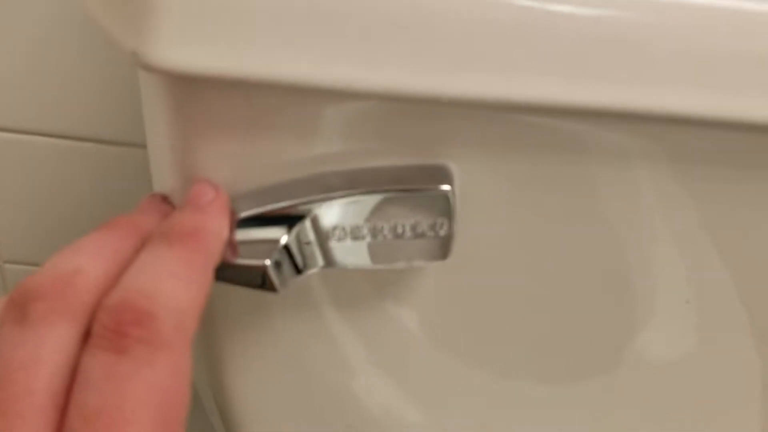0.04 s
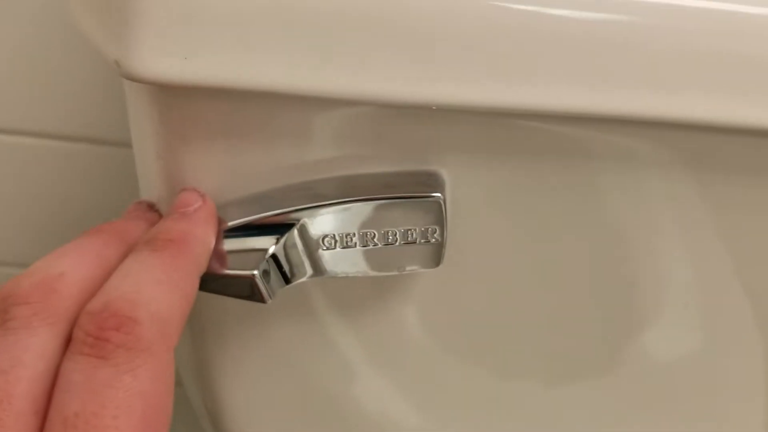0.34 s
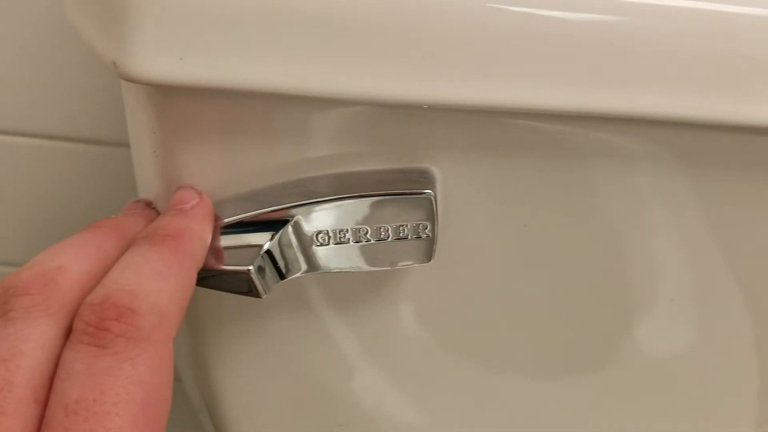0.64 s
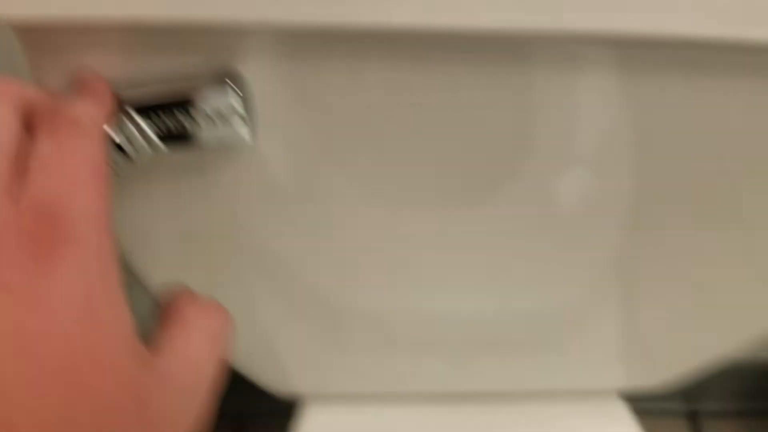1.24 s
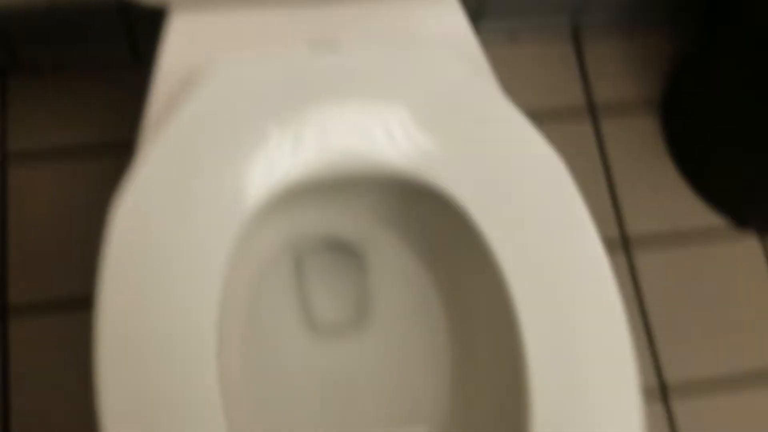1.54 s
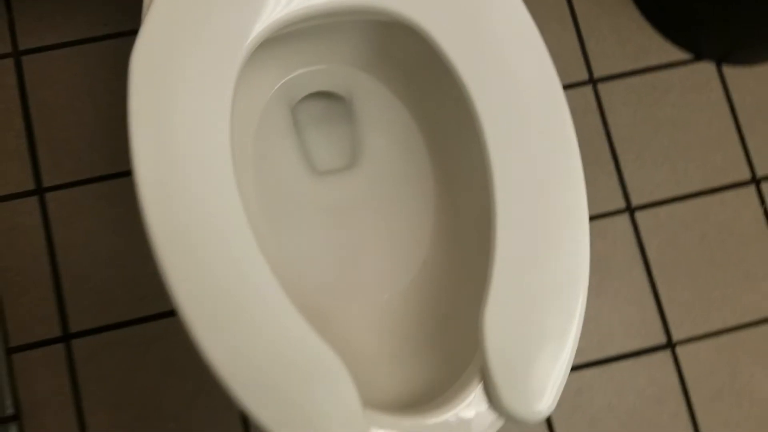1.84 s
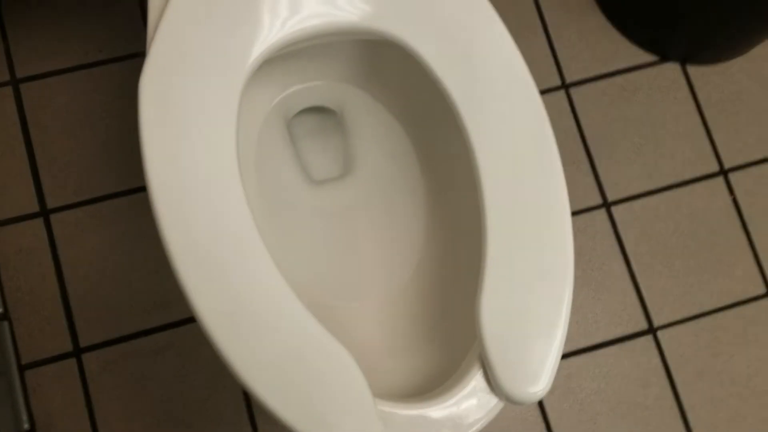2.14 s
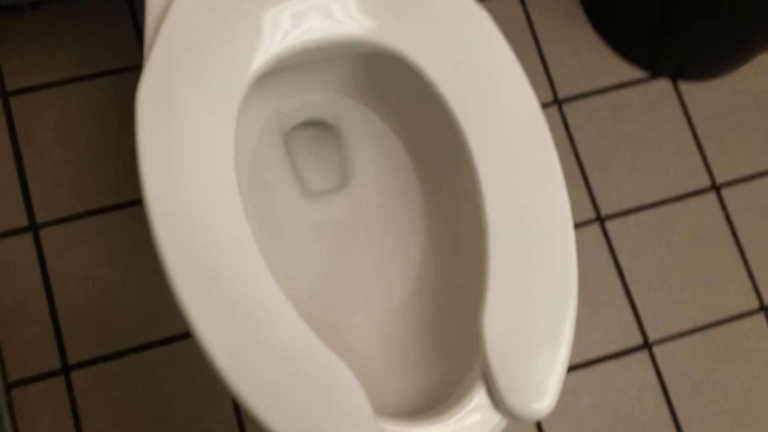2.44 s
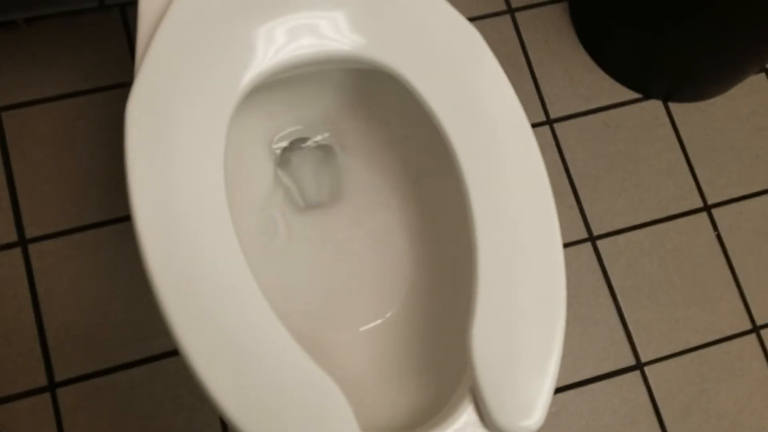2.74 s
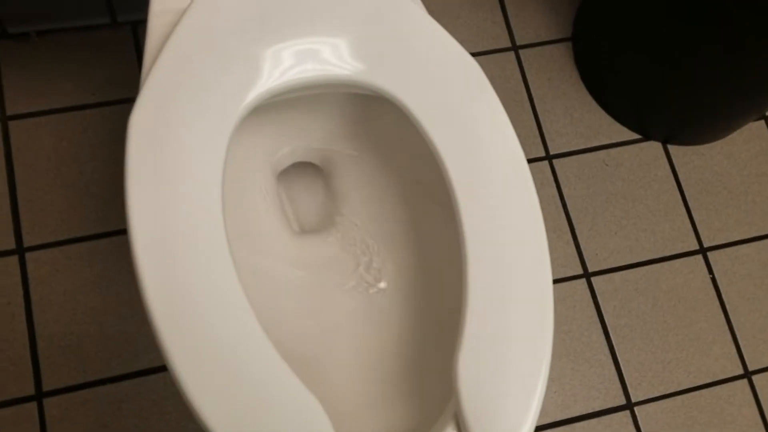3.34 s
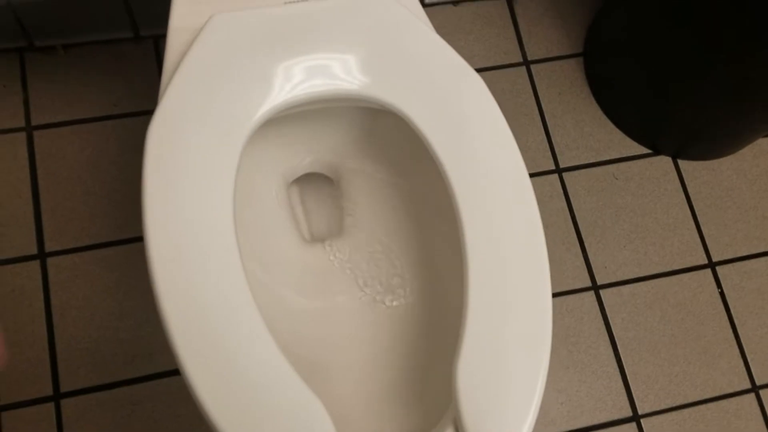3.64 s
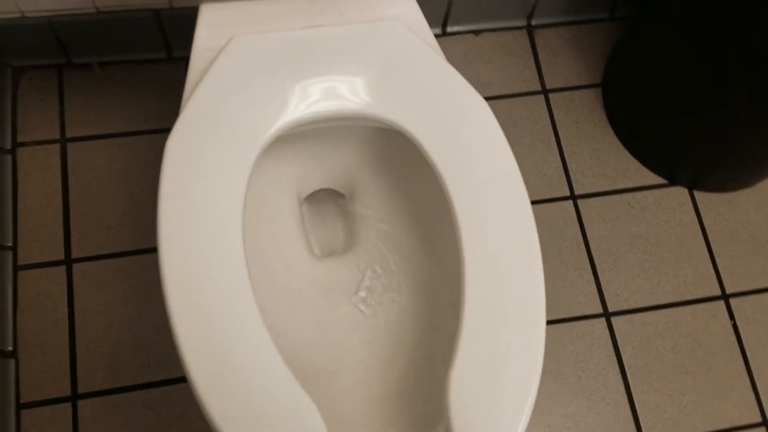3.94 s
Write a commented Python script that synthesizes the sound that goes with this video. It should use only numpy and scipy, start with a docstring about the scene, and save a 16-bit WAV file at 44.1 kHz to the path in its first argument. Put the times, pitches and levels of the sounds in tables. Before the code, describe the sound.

A toilet flushes with a knock and a hissing, gurgling rush of water.

```python
"""A ventilation hum and a faint squeak open the scene, just above a toilet in a small tiled bathroom.
The valve seeps and whistles as the handle goes down, then knocks open a little after two seconds.
A jet of water spits and hisses into the bowl, the water churns with bubbles, and the drain swallows
air in gulps that ring the bowl's hollow."""
import sys
import numpy as np
from scipy import signal
from scipy.fft import rfft, irfft
from scipy.io import wavfile

SR = 44100
rng = np.random.default_rng(int(sys.argv[2]) if len(sys.argv) > 2 else 0)


def waveform_to_disk(signal):
    """Save audio, clipped to [-1, 1], as 16-bit WAV at the path in sys.argv[1]."""
    frames = np.transpose(np.atleast_2d(signal))
    scaled = np.clip(frames, -1, 1) * 32767
    samples = np.round(scaled).astype(np.int16)
    wavfile.write(sys.argv[1], SR, samples)


N = 176400
TIME, FREQS = np.arange(N) / SR, np.fft.rfftfreq(N, 1 / SR)


def undb(db):
    """Decibels to gain."""
    return 10 ** (np.asarray(db) / 20)

def unit(x):
    """Scale to rms 1."""
    return x / np.sqrt(np.mean(x ** 2) + 1e-20)

def fader(table, column=1):
    """Ride the gain along a level column; silent before the first row."""
    rows = np.array(table)
    return undb(np.interp(TIME, rows[:, 0], rows[:, column], left=-200))

def equalise(x, curve, amount=1):
    """Apply an EQ curve of (Hz, dB) points, its decibels scaled by amount."""
    hz, db = np.array(curve).T
    gain = undb(np.interp(np.log(FREQS + 1), np.log(hz), db))
    return irfft(rfft(x) * gain ** amount, N)

def wander(rate_hz):
    """Smooth random motion with a spread of 1."""
    return unit(irfft(rfft(rng.standard_normal(N)) * np.exp(-(FREQS / rate_hz) ** 2), N))

def wavering(hz, width_hz, purity=0):
    """A narrow tone that drifts in level and phase; its pure share holds steady."""
    phase = 2 * np.pi * np.cumsum(hz * np.ones(N)) / SR
    drift = (wander(width_hz) * np.cos(phase) + wander(width_hz) * np.sin(phase)) / np.sqrt(2)
    return np.sqrt(purity) * np.cos(phase) + np.sqrt(1 - purity) * drift

def spread(pair, crossover_hz=850):
    """A wide source: the two sides share their bass and differ above it."""
    share = 1 / (1 + (FREQS / crossover_hz) ** 4)
    mid, side = rfft(pair) * np.sqrt([1 + share, 1 - share])
    return irfft(np.array([mid + side, mid - side]), N) / 2


# The dark bed of moving air. Each row: frequency in Hz, EQ gain in dB.
AIR_EQ = [(25, -10), (42, -16), (58, 0), (80, -1), (110, -6.5), (190, -8), (260, -18), (330, -15.5),
          (400, -22.5), (520, -27), (800, -35), (1600, -40.5), (2200, -38), (3200, -47.5), (6500, -62.5),
          (9500, -64), (15000, -54.5)]
# Fan hum and thin pipe tones. Each row: pitch in Hz, width in Hz, level in dB.
HUM_TONES = [(145.2, 8.9, -28), (215.4, 41, -45), (375.5, 9.9, -49), (434, 14, -54.5), (883, 4, -76),
             (1027, 4, -70), (2200, 4, -74.5)]

def ventilation(air_db=-36.5):
    """Air rumbles under the wavering hum of the fan and pipes."""
    air = unit(equalise(spread(rng.standard_normal((2, N))), AIR_EQ)) * undb(air_db)
    hum = sum(wavering(hz, width) * undb(db) for hz, width, db in HUM_TONES)
    fade_in = np.minimum(TIME / .01, 1)
    return fade_in * (air + hum)


# Squeaks and whistles of the handle and valve. Each row: start in seconds, length in seconds,
# first pitch in Hz, final pitch in Hz, width in Hz, level in dB.
VALVE_WHISTLES = [(0, 0.14, 3150, 3180, 25, -64), (0.17, 0.43, 3400, 3780, 520, -66.5),
                  (0.41, .2, 2000, 2006, 66, -61), (0.627, 0.31, 2066, 2124, 48, -55),
                  (0.901, 1, 2100, 2043, 80, -67), (1.767, 0.37, 1045, 1048, 5.4, -57),
                  (1.759, 0.27, 2270, 2345, 90, -58.5), (1.763, 0.17, 4180, 4220, 78, -58),
                  (1.73, 0.37, 6470, 6550, 95, -70.5), (1.773, 0.17, 9900, 11600, 50, -68),
                  (2.344, 0.22, 1300, 1270, 22, -28), (2.504, 0.5, 1370, 1385, 20, -30)]
# The seep swells ahead of the flush. Each row: time in seconds, level in dB.
SEEP_FADER = [(1.6, -80), (1.71, -53), (1.79, -49.5), (1.93, -49.5), (2.15, -53.5), (2.3, -66)]
# The seep's soft hiss. Each row: frequency in Hz, EQ gain in dB.
SEEP_EQ = [(400, 10.5), (800, 1), (1500, -1.5), (2400, 3.5), (3600, -6.5), (4400, -5), (5400, -18),
           (6600, -17), (10000, -23), (14000, -18)]

def valve(settle_s=.028, pure_below_hz=60):
    """Water seeps through the barely open valve, with whistles that settle in pitch."""
    out = unit(equalise(rng.standard_normal((2, N)), SEEP_EQ)) * fader(SEEP_FADER)
    for start, length, first_hz, final_hz, width, db in VALVE_WHISTLES:
        age = np.clip(TIME - start, 0, length)
        hz = final_hz + (first_hz - final_hz) * np.exp(-age / settle_s)
        purity = np.exp(-width / pure_below_hz)  # narrower whistles hold steadier
        swell = np.sin(np.pi * np.sqrt(age / length))
        out += wavering(hz, width, purity) * swell * undb(db)
    return out


def bubbles(start, length, hz, octaves, per_s=900, cycles=7.8, rise=0.26, scatter_db=3.5):
    """A cloud of bubbles scattered around one pitch: each is a damped tone that rises."""
    out = np.full(N + SR, 1e-18)
    draws = np.random.default_rng(rng.integers(2 ** 31))
    for k in range(int(length * per_s)):
        pitch, size = draws.standard_normal(2)
        at = int((start + (k + draws.random()) / per_s) * SR)
        bubble_hz = hz * 2 ** (octaves * np.clip(pitch, -2, 2))
        life = np.linspace(0, 1, int(cycles * SR / bubble_hz))
        phase = 2 * np.pi * cycles * life * (1 + rise * life / 2)
        tone = np.sin(phase) * np.exp(-np.log(100) * life)
        out[at:at + len(life)] += tone * undb(scatter_db * size) * draws.choice([-1, 1])
    low_cut = signal.butter(4, min(210, 0.9 * hz), 'high', fs=SR, output='sos')
    return signal.sosfilt(low_cut, out[:N])


# The bowl's hollow voice. Each row: resonance in Hz, width in Hz, gain in dB.
BOWL_MODES = [(211.6, 7.2, 9), (264.4, 9.1, 14), (312.7, 16, 12.5), (387.2, 8.4, 6), (461.7, 9.9, 6),
              (655.6, 47, 9.5), (1002, 46, 4.5), (1245, 32, 5), (1373, 25, 4.5), (1730, 24, 7),
              (2053, 105, 2), (2397, 115, -1.5)]

def bowl(x):
    """The porcelain hollow rings with the water."""
    return x + sum(undb(db) * signal.lfilter(*signal.iirpeak(hz, hz / width, fs=SR), x + 1e-18)
                   for hz, width, db in BOWL_MODES)


# The churn heaves and eases. Each row: time in seconds, level in dB.
CHURN_FADER = [(2.17, -43.5), (2.27, -24.5), (2.55, -22), (2.74, -28.5), (2.9, -27.5), (3.1, -23.5),
               (3.35, -19.5), (3.5, -25.5), (3.75, -29), (4.0, -31.5)]

def churn():
    """Bubbles of all sizes tumble in the bowl."""
    start = CHURN_FADER[0][0]
    cloud = bowl(bubbles(start, N / SR - start, hz=366, octaves=0.825))
    return cloud / np.std(cloud[TIME > start]) * fader(CHURN_FADER)


# The tank's ring. Each row: pitch in Hz, seconds to fall 60 dB, level within the knock in dB.
TANK_MODES = [(665, .25, -9), (980, .55, 0.5), (1070, 0.32, -3), (1215, 0.18, -11.5), (2016, 0.18, -11)]

def knock(start=2.173, attack_s=0.0054, level_db=-25.5, rattle_decay_s=0.074, rattle_mix_db=-12.5):
    """The valve opens with a knock that rings the tank, and a short dull rattle."""
    age = np.maximum(TIME - start, 0)
    ring = sum(undb(db) * np.sin(2 * np.pi * hz * age) * np.exp(-np.log(1000) * age / t60)
               for hz, t60, db in TANK_MODES)
    high_cut = signal.butter(2, 2430, fs=SR, output='sos')
    dull_noise = unit(signal.sosfilt(high_cut, rng.standard_normal(N)))
    rattle = dull_noise * np.exp(-age / rattle_decay_s) * undb(rattle_mix_db)
    return (ring + rattle) * np.minimum(age / attack_s, 1) * undb(level_db)


def drops(per_s=16000, scatter_db=2.5):
    """Dense impacts of uneven size, on two sides."""
    hits = (rng.random((2, N)) < per_s / SR) * rng.standard_normal((2, N))
    return hits * undb(scatter_db * rng.standard_normal((2, N)))

def flicker(x, rate_hz=29, depth_db=0.36):
    """The splash keeps changing shape, so each half octave swells slightly on its own."""
    band = 2 * np.log2(np.clip(FREQS, 500, 8000) / 500)
    spectrum = rfft(x)
    slices = (irfft(spectrum * np.maximum(1 - np.abs(band - k), 0), N) for k in range(9))
    return sum(part * undb(depth_db * wander(rate_hz)) for part in slices)


# The jet's stereo tilt. Each row: frequency in Hz, left minus right in dB before each side's amount.
JET_PAN = [(700, -2.5), (1300, -5.5), (2300, -10), (3400, -9), (5200, 0), (7000, 2), (8400, -6.5),
           (10000, -0.5), (15000, -1.5)]

def lean_right(pair):
    """The jet is louder on the right."""
    return np.array([equalise(pair[0], JET_PAN, amount=0.065), equalise(pair[1], JET_PAN, amount=-0.74)])


# The jet bursts in and keeps running. Each row: time in seconds, rush level in dB, spray level in dB.
JET_FADERS = [(2.19, -70, -83), (2.228, -58, -38), (2.244, -54, -59), (2.255, -28, -41), (2.32, -28, -34.5),
              (2.43, -23, -27.5), (2.55, -27, -28.5), (2.6, -19.5, -24), (2.68, -19, -22.5),
              (2.82, -21, -22.5), (2.92, -23.5, -26.5), (3.01, -24, -29.5), (3.09, -22, -25),
              (3.16, -22.5, -28), (3.25, -26, -30), (3.52, -24, -30.5), (3.73, -22, -28.5),
              (3.86, -22.5, -27), (4.0, -23, -25.5)]
# The full-bodied rush and the bright spray. Each row: frequency in Hz, EQ gain in dB.
RUSH_EQ = [(250, -18), (600, -13), (850, -1), (1200, 0), (1600, 1.5), (2300, -0.5), (3200, -0.5),
           (4400, -6.5), (6500, -17.5), (16000, 1)]
SPRAY_EQ = [(2000, -8.5), (4500, 2.5), (6500, 1.5), (8500, 0.5), (12500, 3), (15800, -5)]

def jet(rush_surge_db=2.39, spray_surge_db=0.96):
    """The surging jet drums on the bowl and throws fine spray."""
    drumming = bowl(equalise(spread(drops()), RUSH_EQ))
    rush = lean_right(unit(flicker(drumming))) * undb(rush_surge_db * wander(rate_hz=47))
    fizz = equalise(drops(), SPRAY_EQ)
    spray = lean_right(unit(fizz)) * undb(spray_surge_db * wander(rate_hz=58))
    return rush * fader(JET_FADERS, column=1) + spray * fader(JET_FADERS, column=2)


# The spit's bite and sizzle. Each row: frequency in Hz, EQ gain in dB.
SPIT_EQ = [(1200, -28), (2100, 13.5), (3500, -43), (7000, -26), (9500, -7), (11500, 9), (15500, -9)]

def spit(start=2.242, attack_s=0.022, decay_s=0.068, level_db=-25):
    """The first water leaves the jet with a bright spit."""
    age = np.maximum(TIME - start, 0)
    envelope = np.minimum(age / attack_s, 1) * np.exp(-age / decay_s)
    return lean_right(unit(equalise(drops(), SPIT_EQ))) * envelope * undb(level_db)


# The drain's glugs. Each row: start in seconds, length in seconds, bubble pitch in Hz, level in dB.
DRAIN_GULPS = [(2.246, 0.061, 297, -31), (2.28, 0.02, 158, -19), (2.391, 0.034, 306, -21),
               (2.468, 0.051, 417, -21), (2.647, 0.023, 300, -27), (2.859, 0.043, 220, -21),
               (2.915, 0.059, 325, -20), (2.958, 0.075, 464, -16), (2.974, 0.083, 324, -17),
               (2.982, 0.12, 894, -23.5), (3.187, 0.049, 1185, -18.5), (3.228, 0.02, 1830, -17.5),
               (3.252, 0.049, 315, -16), (3.402, 0.05, 280, -13), (3.488, 0.018, 1210, -19.5),
               (3.56, .14, 271, -19.5), (3.692, 0.015, 1146, -19), (3.872, 0.06, 286, -22)]

def gulps(attack_s=0.0057, release_s=0.022):
    """Each gulp of air breaks into a burst of bubbles of like size that rings the bowl."""
    out = np.zeros(N)
    for start, length, hz, db in DRAIN_GULPS:
        age = TIME - start
        envelope = np.clip(age / attack_s, 0, 1) * np.exp(-np.maximum(age - length, 0) / release_s)
        burst = bowl(bubbles(start, length + 2 * release_s, hz, octaves=0.27) * envelope)
        out += unit(burst) * np.sqrt(length * SR / N) * undb(db)
    return out


def room(x, t60_s=0.79, mid_db=-1, low_hz=810, high_hz=4970, spacing_m=0.095, left_lead_s=.00008):
    """Tile reflections reach two spaced microphones and change as the hand holding them drifts."""
    tail_time, hz = TIME[:SR // 2], np.fft.rfftfreq(2 * N, 1 / SR)
    decay = undb(-60 * tail_time / t60_s)
    likeness = np.sinc(2 * hz * spacing_m / 343)  # alike in the bass, unrelated in the treble
    width = np.sqrt((1 - likeness) / (1 + likeness) / (1 + (hz / high_hz) ** 2))
    band = signal.butter(2, [low_hz, high_hz], 'band', fs=SR, output='sos')
    direct = rfft(x, 2 * N) * np.exp(-2j * np.pi * np.outer([0, left_lead_s], hz))
    out = irfft(direct)[:, :N]
    place = np.linspace(0, 3, N)  # crossfade through four spots, each with its own tail
    for spot in range(4):
        common, apart = unit(rng.standard_normal((2, len(decay))) * decay) / np.sqrt(len(decay))
        mid = undb(mid_db) * rfft(signal.sosfilt(band, common), 2 * N)
        side = width * rfft(apart, 2 * N)
        nearness = np.cos(np.pi / 2 * np.minimum(np.abs(place - spot), 1))
        out += nearness * irfft(direct * np.array([mid + side, mid - side]))[:, :N]
    return out

def scene():
    """Water, valve and ventilation all sound in the same tiled room."""
    water = jet() + spit() + churn() + gulps()
    return room(water + knock() + valve() + ventilation())

def record(dry):
    """A steep cut takes off the very top, and peaks clip at full scale."""
    high_cut = signal.ellip(10, .2, 70, 16050, fs=SR, output='sos')
    return np.clip(signal.sosfilt(high_cut, dry), -1, 1)


dry = scene()
out = record(dry)
waveform_to_disk(out)
```